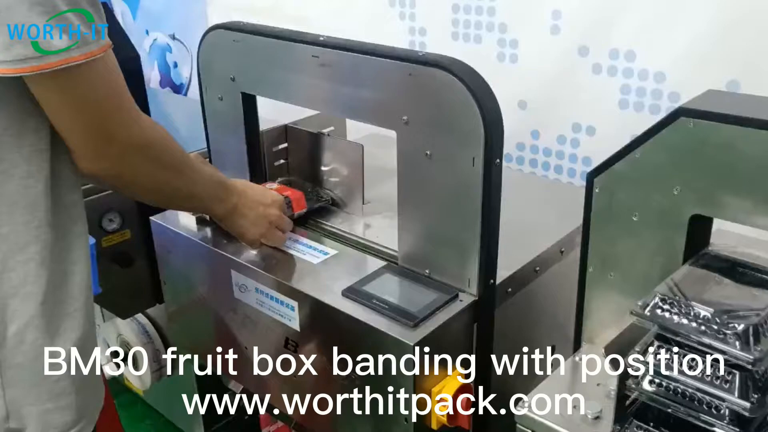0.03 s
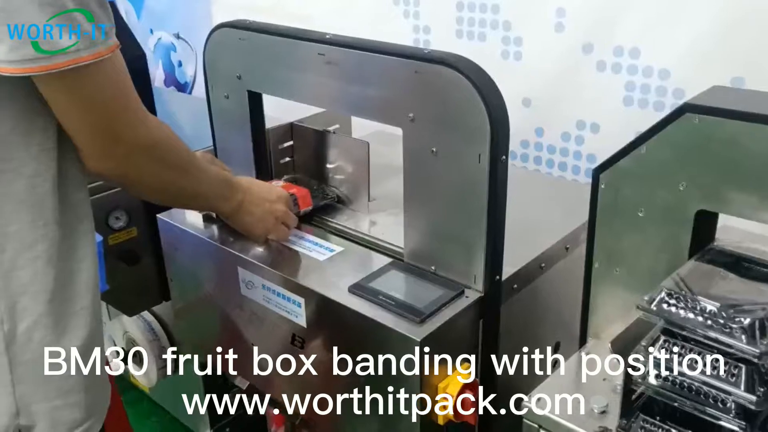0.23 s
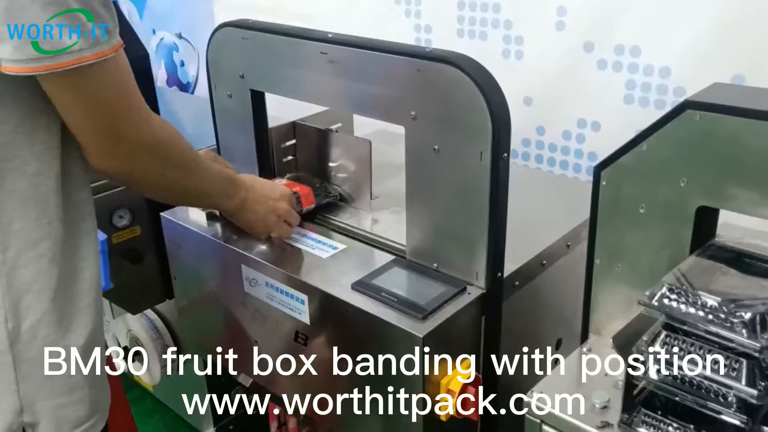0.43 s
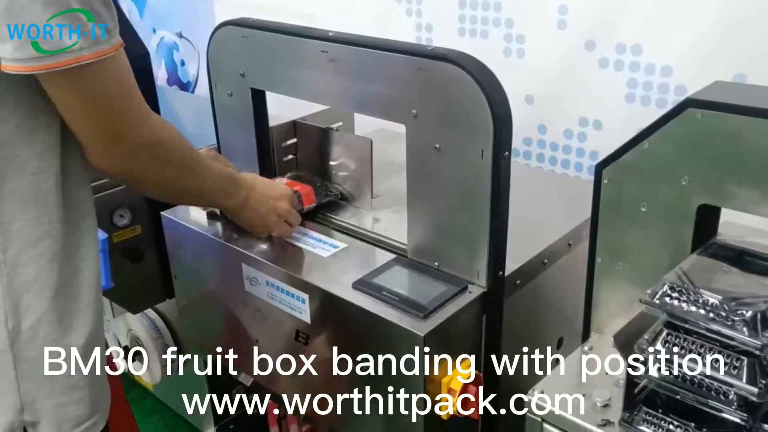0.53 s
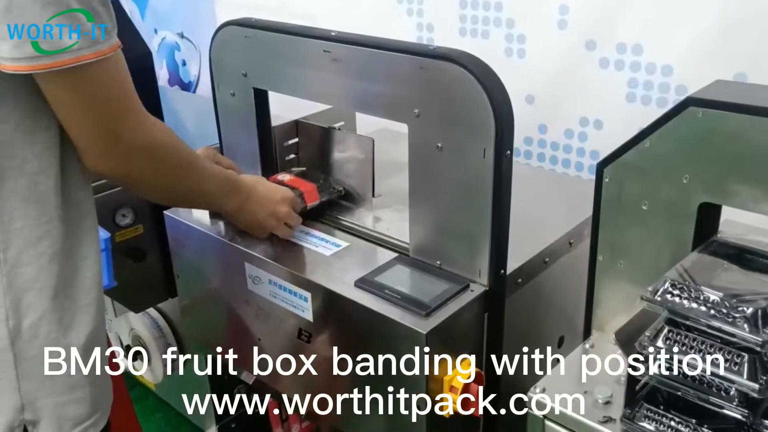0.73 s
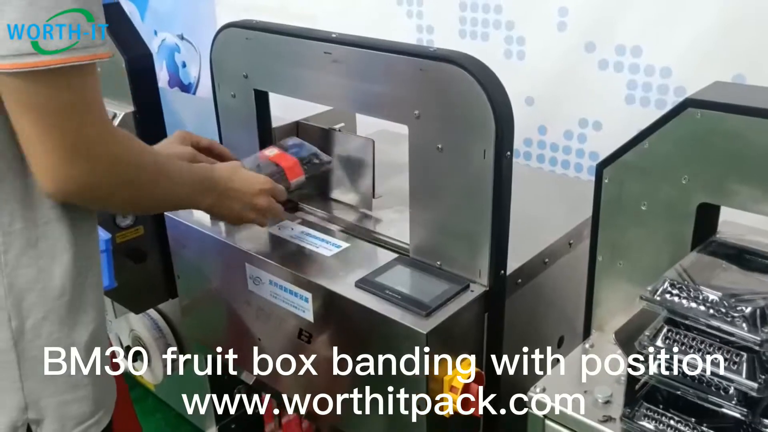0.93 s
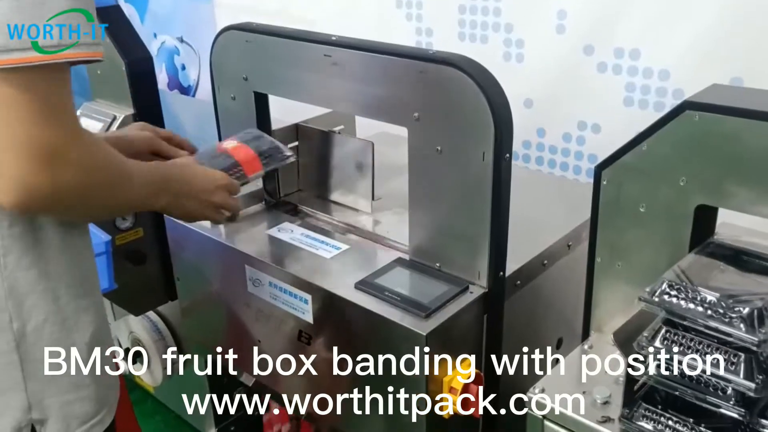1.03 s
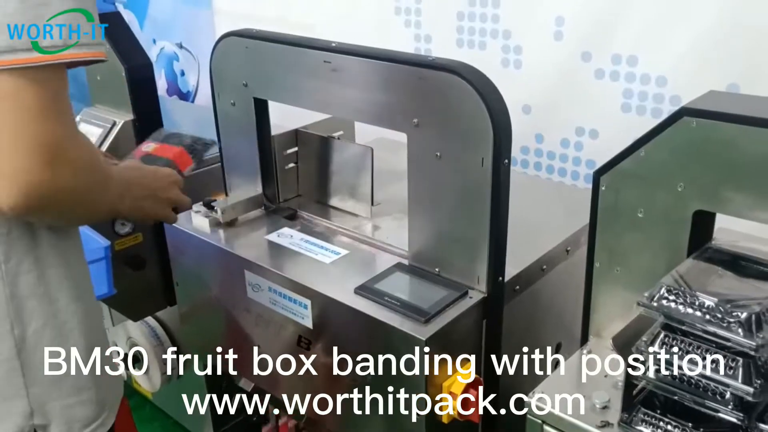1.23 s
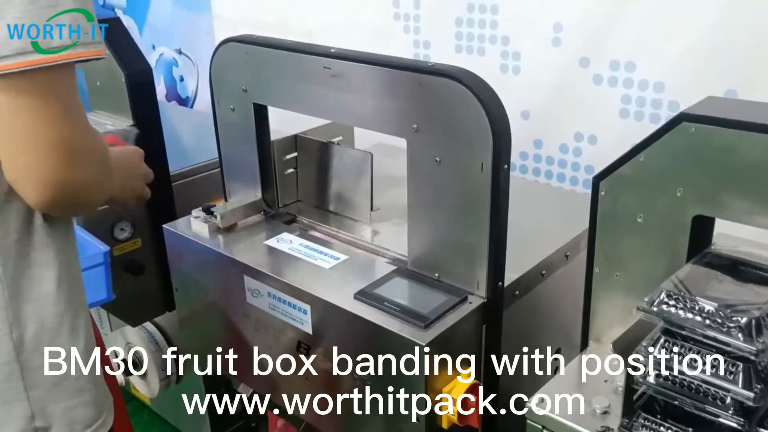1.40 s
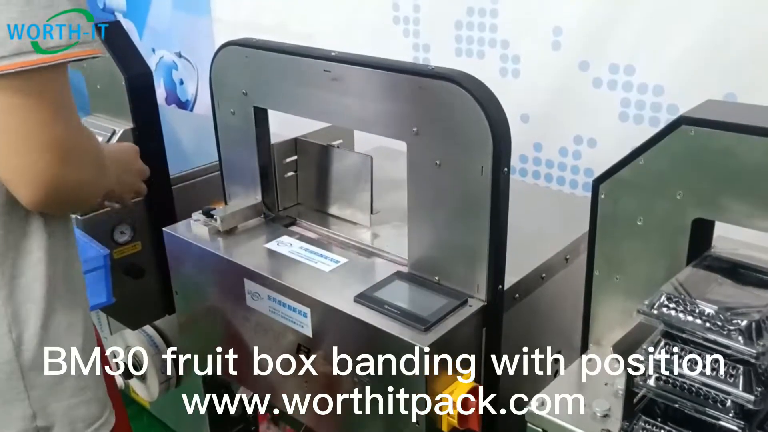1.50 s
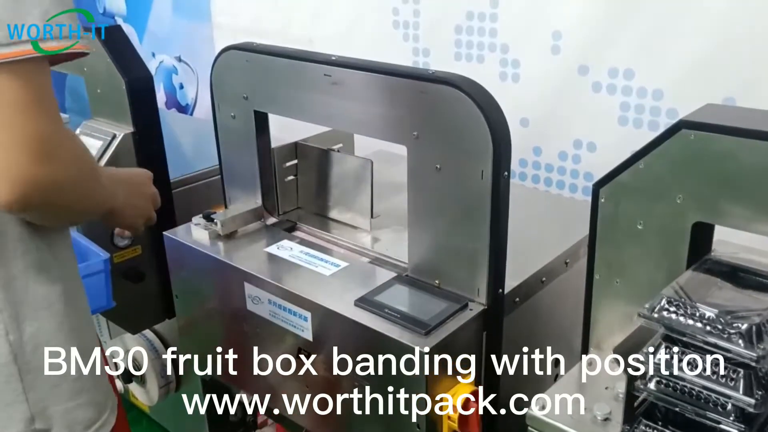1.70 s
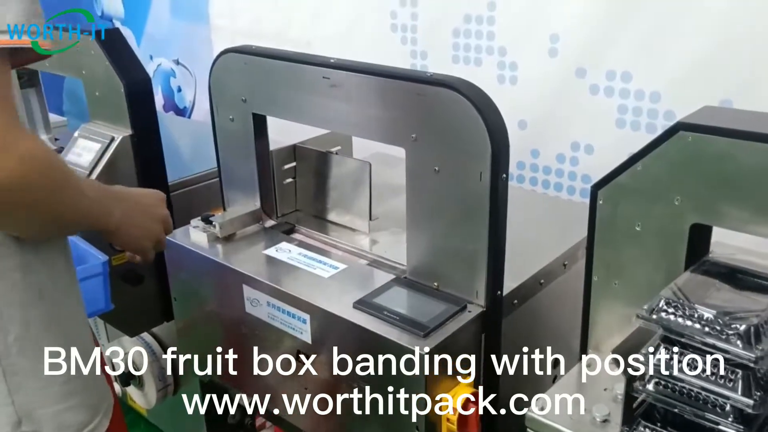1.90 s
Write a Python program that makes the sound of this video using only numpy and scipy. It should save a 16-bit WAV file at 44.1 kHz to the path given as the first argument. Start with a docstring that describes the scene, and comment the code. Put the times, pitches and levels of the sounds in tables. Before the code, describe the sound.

A banding machine pulls a band tight with a rasp, short squeals and sharp metallic clacks. A thin whistle lingers on the left, then new band rustles and slaps softly over motor hum, close by in a reverberant workshop.

```python
"""A reverberant workshop, with two microphones 11 cm apart near a banding machine ending its cycle.
The band is drawn tight with a rasp and short stick-slip squeals. Clamp, cutter and slide clack and
set the steel housing ringing, and a thin whistle lingers to the left. Then new band rustles and slaps
softly round the arch. Behind it all, the motor hums and the fan rushes."""
import sys
import numpy as np
from scipy import signal
from scipy.fft import rfft, irfft
from scipy.io import wavfile

SR = 44100
rng = np.random.default_rng(int(sys.argv[2]) if len(sys.argv) > 2 else 0)


def inscribe(sig):
    """Save sig as 16-bit PCM at rate SR to the path in sys.argv[1].

    A 1-D sig is mono; a 2-D sig holds one channel per row.
    Samples are clipped to [-1, 1] before scaling.
    """
    pcm = np.round(np.clip(np.atleast_2d(sig).T, -1, 1) * 32767)
    wavfile.write(sys.argv[1], SR, pcm.astype(np.int16))


N = 85995

# Blows of clamp, cutter and slide:
# start_s, level_db, hold_s, t60_s, thud_db, body_db, clang_db, edge_db, sizzle_db
BLOWS = [(0.131, -33.5, 0.0042, 0.44, -38, -10, 0.5, -8.5, 2),
         (0.17, -30.5, 0.017, 0.14, -21, 9.5, 2, 3, 4), (0.2166, -22, 0.007, 0.2, -12, 1.5, -0.5, 1, 8),
         (.3, -19, .0044, .14, 0, -.5, .5, 0, -5), (0.326, -26.5, 0.02, 0.15, -11, 7.5, -0.5, -2, 5),
         (.4986, -9, .0031, .018, -32, -16, -3.5, -6, -5), (.508, -17, .01, .045, -42, -4, .5, 2.5, 1),
         (0.538, -25.5, 0.0018, .05, -10, 0, -13, 3, 0), (.6, -24.5, .007, .036, -6, -4, -4, -5, 6),
         (0.617, -19, 0.0088, 0.096, -3, -12, -8.5, -12, -0.5),
         (0.653, -30.5, 0.009, 0.054, -4, -10, 12, 14, -19), (.6765, -14, .003, .035, -2, 1, -1, 0, -14),
         (0.71, -31.5, 0.008, 0.028, 5, 7, 0, -14, -8)]
# Where thud, body, clang, edge and sizzle lie: frequency_hz
BLOW_BANDS_HZ = (250, 800, 2500, 4500, 12000)
# Spectrum the housing gives every blow: frequency_hz, level_db
HOUSING_COLOUR = [(35, -63), (60, -43), (107, -26), (248, -37), (278, -8.5), (312, -10.5), (756, -7),
                  (869, -9.5), (1070, -7), (1790, -11.5), (2410, -5), (3190, -12), (5710, -18.5),
                  (6260, -9.5), (15500, -32)]
# Modes of the steel housing: pitch_hz, level_db, t60_s
STEEL_MODES = [(855, -37, .3), (926, -38, .25), (984, -38, .4), (1131, -41, .4), (1432, -40, .22),
               (2060, -44, .3), (2431, -38, .25), (2555, -45, .35), (2712, -45, .35), (2831, -42, .35),
               (3381, -39, .2), (7122, -35, .22)]
# Small struck parts: start_s, pitch_hz, level_db, t60_s, left_minus_right_db
PINGS = [(.131, 2400, -50, 0.092, 0), (0.223, 2850, -23, 0.044, 3), (0.3, 4150, -20, 0.038, 13),
         (0.4999, 2435, -13.5, 0.011, -1.5), (.502, 2430, -20.5, .13, 0), (.549, 2430, -31, .1, 0),
         (0.603, 870, -16.5, 0.05, 6), (0.6783, 4500, -16, 0.0055, 10), (0.68, 2540, -23, 0.022, 2),
         (0.675, 860, -18, 0.054, 4)]
# Rasp of the tightening band: time_s, level_db
RASP_LEVEL = [(.115, -46), (.14, -40.5), (.18, -37.5), (.22, -32.5), (.255, -28), (.29, -29.5), (.32, -26),
              (.35, -27), (.40, -28), (.45, -31.5), (.49, -49), (.56, -45), (.605, -21), (.645, -26),
              (.67, -37), (.71, -28.5), (.74, -35.5), (.95, -42.5), (1.1, -65), (1.3, -95)]
# Spectrum of the rasp: frequency_hz, level_db
RASP_COLOUR = [(47, -52), (80, -17), (107, -10), (252, 4.5), (281, -14), (741, 2.5), (1260, 1.5),
               (2600, -0.5), (4320, -4.5), (5270, -2.5), (5750, -2), (13900, -16), (15500, -45)]
# Drive whines and band squeals:
# start_s, length_s, pitch_hz, glide_hz, level_db, jitter_ratio, flutter_db, left_minus_right_db
WHINES = [(.231, .018, 880, 10, -35, .02, 2, 2), (.249, .025, 905, 20, -31, .015, 2, 2),
          (.304, .048, 886, 0, -28, .005, 1.5, 4), (.32, .034, 975, 0, -32.5, .02, 3, 4),
          (.22, .07, 212, 0, -42.5, .03, 0, 1), (.40, .095, 226, 0, -40, .04, 0, 1),
          (.37, .014, 5130, 60, -32, .014, 2, 2), (.384, .019, 5230, 0, -25.5, .016, 2.5, 4),
          (.415, .016, 5220, 70, -26, .016, 2, 8), (.431, .024, 5360, -130, -31, .026, 3, 6),
          (1.765, .035, 525, 0, -43, .004, 0, -3), (1.795, .07, 528, 0, -38, .004, 0, -3)]
# Thin, lingering whistle: time_s, level_db
WHISTLE_LEVEL = [(.631, -53), (0.641, -26), (.654, -21.5), (.664, -22), (0.676, -39), (.71, -39.5),
                 (0.745, -41), (.772, -34.5), (.797, -48), (.816, -33.5), (.835, -48), (.885, -46),
                 (.91, -55), (.955, -49), (1.1, -58)]
# New band sliding in: time_s, level_db
FEED_LEVEL = [(.75, -48), (.9, -32.5), (1.0, -37), (1.08, -36), (1.15, -39), (1.21, -36.5), (1.35, -36.5),
              (1.46, -36), (1.51, -34.5), (1.6, -37.5), (1.68, -36), (1.72, -47), (1.8, -84)]
# Spectrum of the sliding band: frequency_hz, level_db
FEED_COLOUR = [(120, -34), (400, -6), (700, -3), (950, -1.5), (1150, -11), (1800, -10), (2400, -7),
               (3300, -16), (5000, -16), (8000, -21), (10000, -25.5), (15500, -28)]
# The band slapping its guide: start_s, level_db, hold_s
SLAPS = [(0.88, -38.5, 0.025), (1.01, -38, 0.014), (1.275, -46, 0.022), (1.431, -34.5, 0.013),
         (1.516, -38, 0.015), (1.533, -35.5, 0.026), (1.567, -38.5, 0.011), (1.592, -37, 0.023),
         (1.655, -35.5, 0.018), (1.694, -37, 0.017)]
# Spectrum of a slap: frequency_hz, level_db
SLAP_COLOUR = [(150, -29), (800, 4), (1800, -4.5), (2600, -3.5), (4500, -2), (8000, -9), (10000, -16.5),
               (15500, -25)]
# Dull knocks of the arch: start_s, level_db, hold_s
KNOCKS = [(1.059, -38.5, 0.036), (1.291, -38, .012), (1.427, -35.5, 0.018), (1.539, -33, 0.035),
          (1.598, -34, 0.031), (1.666, -37, .015)]
# Spectrum of a knock: frequency_hz, level_db
KNOCK_COLOUR = [(150, -39), (450, 3.5), (650, -0.5), (950, 5.5), (1300, -6), (2500, -20), (8000, -38)]
# Sound off the wide panels relative to the contact point: frequency_hz, level_db
PANEL_SPREAD = [(100, -16), (400, -3), (1000, 4), (3000, 3), (12000, 9.5)]
# Motor tones: pitch_hz, level_db
MOTOR_TONES = [(118.4, -43.5), (161, -51), (253, -53.5), (571, -58), (657, -49.5), (840, -50)]
# Swell of the motor hum: time_s, gain_db
MOTOR_SWELL = [(.115, -25), (.22, -6), (.39, -20), (.47, -19), (.52, -3.5), (.71, -2), (.79, 4.5),
               (.95, 3.5), (1.04, -10), (1.12, 7), (1.17, 2), (1.36, -1), (1.42, 1.5), (1.57, 1),
               (1.62, -4.5), (1.73, 2), (1.8, -2), (1.95, 2)]
# Fan and workshop air: time_s, level_db
FAN_LEVEL = [(.115, -59), (.2, -40.5), (.35, -34.5), (.8, -35), (1.3, -37.5), (1.7, -38), (1.95, -39)]
# Spectrum of the fan: frequency_hz, level_db
FAN_COLOUR = [(20, -38), (39, -12), (50, -15), (85, -12.5), (125, -2.5), (180, 0), (260, -2), (340, -3),
              (450, -3), (850, -3.5), (1150, -13), (1800, -18), (2400, -18), (3400, -26.5), (7000, -31),
              (10000, -39), (15500, -47)]
# Time for the workshop to die away: frequency_hz, t60_s
ROOM_T60 = [(100, 1.2), (500, 1.4), (2500, 1.3), (4000, .8), (8000, .62), (15000, .45)]
# Spectrum of the workshop's tail: frequency_hz, level_db
ROOM_COLOUR = [(100, -14), (800, -0.5), (2500, -1), (4000, -6), (7000, -2.5), (15000, -6.5)]

BLOW_ATTACK_S, TONE_EDGE_S, FEED_ATTACK_S = .0016, .002, .00062
STEEL_DB, EARLY_DB = -25.5, -5.5
WHISTLE_HZ, HUM_WAVER_DB = 6094, 1.65
PING_JITTER, WHISTLE_JITTER, HUM_JITTER = .0193, .0008, .01205  # shares of the pitch
FEED_SEND_DB, WHINE_SEND_DB, PING_SEND_DB = -1, -3, -8.5  # into the room
MIC_SPACING_M, MACHINE_DIRECT_DB, LEFT_LEAN_DB = .11, 1, .23
START_S, CUTOFF_HZ = .115, 15500


def blows():
    """Each blow is a short crash of contacts that sets the steel housing ringing."""
    crashes, housing_db = 0, at_hz(HOUSING_COLOUR, bins())
    for start, db, hold, t60, *bands_db in BLOWS:
        colour_db = housing_db + at_hz(list(zip(BLOW_BANDS_HZ, bands_db)), bins())
        crash = chatter(colour_db, grain_db=2)
        crashes += from_db(db) * crash * envelope(start, BLOW_ATTACK_S, hold, t60)
    steel = sum(from_db(db) * ring(crashes, hz, t60) for hz, db, t60 in STEEL_MODES)
    return crashes + from_db(STEEL_DB) * steel


def pings():
    """Each struck part rings briefly and roughly at a pitch of its own."""
    out = 0
    for start, hz, db, t60, pan_db in PINGS:
        strength = from_db(db) * envelope(start, BLOW_ATTACK_S, 0, t60)
        pitch = hz * (1 + PING_JITTER * drift(900))
        out += at_mics(strength * tone(pitch), lag_s=.0004, pan_db=pan_db)
    return out


def tightening():
    """The band rasps as it is pulled tight."""
    return level(RASP_LEVEL) * chatter(at_hz(RASP_COLOUR, bins()), grain_db=.5)


def whines():
    """The drive whines and the band squeals, unsteady in pitch and strength as it sticks and slips."""
    out = 0
    for start, length, hz, glide_hz, db, jitter, flutter_db, pan_db in WHINES:
        t = clock() - start
        gate = np.clip(t / TONE_EDGE_S, 0, 1) * np.clip((length - t) / TONE_EDGE_S + .5, 0, 1)
        strength = from_db(db + flutter_db * drift(350))
        pitch = (hz + glide_hz * np.clip(t / length, 0, 1)) * (1 + jitter * drift(500))
        out += at_mics(strength * gate * tone(pitch), lag_s=.00007, pan_db=pan_db)
    return out


def whistle():
    """A pure high whistle flares up and lingers unevenly, louder at the left microphone."""
    start, end = WHISTLE_LEVEL[0][0], WHISTLE_LEVEL[-1][0]
    strength = envelope(start, TONE_EDGE_S, end - start, t60_s=.3) * level(WHISTLE_LEVEL)
    pitch = WHISTLE_HZ * (1 + WHISTLE_JITTER * drift(240))
    return at_mics(strength * tone(pitch), lag_s=.00034, pan_db=8)


def feeding():
    """New band slides and slaps round the arch, which knocks dully."""
    slide = level(FEED_LEVEL) * chatter(at_hz(FEED_COLOUR, bins()), grain_db=2.5)
    slap_gain = sum(from_db(db) * envelope(start, FEED_ATTACK_S, hold, t60_s=.061)
                    for start, db, hold in SLAPS)
    slaps = slap_gain * chatter(at_hz(SLAP_COLOUR, bins()), grain_db=3.2)
    knock_gain = sum(from_db(db) * envelope(start, .0023, hold, t60_s=.086)
                     for start, db, hold in KNOCKS)
    knocks = knock_gain * chatter(at_hz(KNOCK_COLOUR, bins()), grain_db=2)
    running = envelope(0, FEED_ATTACK_S, hold_s=1.7, t60_s=.15)
    return running * (slide + slaps + knocks)


def motor_and_fan():
    """Wavering motor tones sit in the rush of the fan."""
    hum = 0
    for hz, db in MOTOR_TONES:
        strength = from_db(db + HUM_WAVER_DB * drift(23))
        hum += strength * tone(hz * (1 + HUM_JITTER * drift(30.04)))
    rush = tint(diffuse(), at_hz(FAN_COLOUR, bins()))
    return level(MOTOR_SWELL) * hum + level(FAN_LEVEL) * rush


def workshop(x):
    """Quick reflections come off the machine, then a long tail dulls as it dies."""
    early = diffuse() * envelope(start_s=.00242, attack_s=.00086, hold_s=0, t60_s=.039)
    response = from_db(EARLY_DB) * unit_rms(early) / np.sqrt(N)
    air, centres_hz = rfft(diffuse()), np.geomspace(100, 15000, 9)
    for hz, pick in zip(centres_hz, np.eye(len(centres_hz))):
        band = np.interp(np.log(bins() + 1), np.log(centres_hz), pick)  # overlapping triangles
        decay = unit_rms(envelope(0, attack_s=.014, hold_s=0, t60_s=at_hz(ROOM_T60, hz))) / np.sqrt(N)
        response += from_db(at_hz(ROOM_COLOUR, hz)) * irfft(air * band, N) * decay
    return signal.fftconvolve(x, response, axes=1)[:, :N]


def chatter(colour_db, grain_db):
    """Dense tiny contacts of uneven strength, coloured and spread by the panels they strike."""
    spread = from_db(at_hz(PANEL_SPREAD, bins()))
    contact = rfft(at_mics(rng.standard_normal(N), lag_s=.00036, pan_db=0))
    panels = spread * rfft(diffuse())
    blend = irfft((contact + panels) / np.sqrt(1 + spread ** 2), N)
    return tint(blend * from_db(grain_db * drift(900)), colour_db)


def at_mics(x, lag_s, pan_db):
    """A point source reaches the left microphone lag_s later and pan_db louder than the right."""
    delayed = np.interp(clock() - lag_s, clock(), x)
    return np.array([from_db(pan_db / 2) * delayed, from_db(-pan_db / 2) * x])


def diffuse():
    """Noise from all sides, alike at the two microphones only in the bass."""
    alike = .99 * np.sinc(2 * bins() * MIC_SPACING_M / 343)
    mid, side = rfft(rng.standard_normal((2, N)))
    pair = np.sqrt(1 + alike) * mid + np.sqrt(1 - alike) * side * [[1], [-1]]
    return irfft(pair / np.sqrt(2), N)


def ring(x, hz, t60_s):
    """One mode: a unit click rings as a dying sine of height 1."""
    radius, angle = np.exp(-np.log(1000) / (t60_s * SR)), 2 * np.pi * hz / SR
    return signal.lfilter([0, np.sin(angle)], [1, -2 * radius * np.cos(angle), radius ** 2], x + 1e-18)


def tone(hz):
    """A sine of unit rms along a pitch curve."""
    return np.sqrt(2) * np.sin(2 * np.pi * (np.cumsum(hz) / SR + rng.random()))


def envelope(start_s, attack_s, hold_s, t60_s):
    """Rise, hold and die away."""
    t = clock() - start_s
    decay = np.exp(-np.log(1000) * np.maximum(t - attack_s - hold_s, 0) / t60_s)
    return np.clip(t / attack_s, 0, 1) * decay


def drift(knots_per_s):
    """A random wander with spread 1."""
    knots = rng.standard_normal(int(N / SR * 4000) + 2)
    return np.interp(clock() * min(knots_per_s, 4000), np.arange(len(knots)), knots) * np.sqrt(3 / 2)


def tint(x, colour_db):
    """Give noise a spectrum, at unit rms."""
    return unit_rms(irfft(rfft(x) * from_db(colour_db), N))


def level(points):
    """Gain along a curve of time_s, level_db."""
    return from_db(np.interp(clock(), *np.transpose(points)))


def at_hz(points, hz):
    """Read a table on a log-frequency axis."""
    table_hz, values = np.transpose(points)
    return np.interp(np.log(hz + 1), np.log(table_hz), values)


def from_db(db):
    """Decibels to gain."""
    return 10 ** (np.asarray(db) / 20)


def unit_rms(x):
    """Scale to unit rms."""
    return x / np.sqrt(np.mean(x ** 2) + 1e-20)


def clock():
    """Time of every sample in seconds."""
    return np.arange(N) / SR


def bins():
    """Frequency of every spectral bin in hertz."""
    return np.arange(N // 2 + 1) * SR / N


def scene():
    """The machine in its room; the small, near parts sound drier than the housing."""
    machine = blows() + tightening()
    feed, struck, squeals = feeding(), pings(), whines()
    direct = from_db(MACHINE_DIRECT_DB) * machine + feed + squeals + struck + whistle()
    room = workshop(machine + from_db(FEED_SEND_DB) * feed + from_db(WHINE_SEND_DB) * squeals
                    + from_db(PING_SEND_DB) * struck)
    return (direct + room + motor_and_fan()) * from_db([[LEFT_LEAN_DB], [-LEFT_LEAN_DB]])


def record(dry):
    """The sound cuts in after a moment of silence; peaks are rounded and the top is cut."""
    fade_in = np.clip((clock() - START_S) / .002, 0, 1)
    lowpass = signal.ellip(10, .1, 80, CUTOFF_HZ, fs=SR, output="sos")
    return signal.sosfilt(lowpass, np.tanh(dry) * fade_in)


dry = scene()
out = record(dry)
inscribe(out)
```